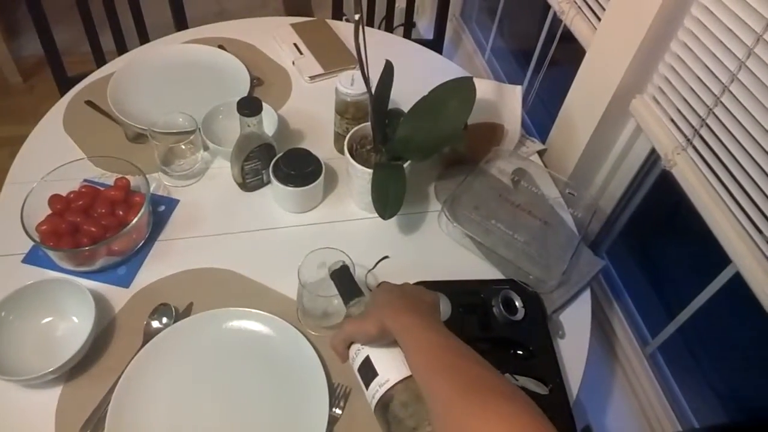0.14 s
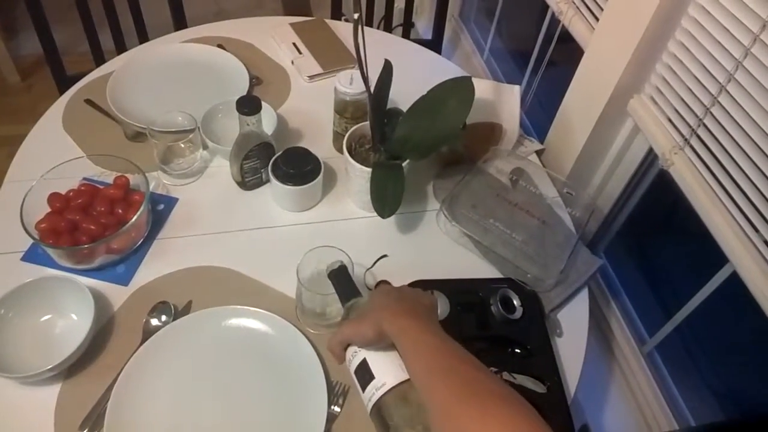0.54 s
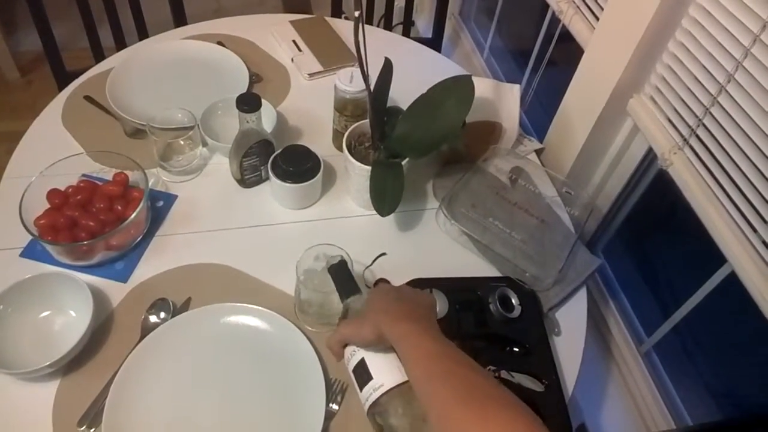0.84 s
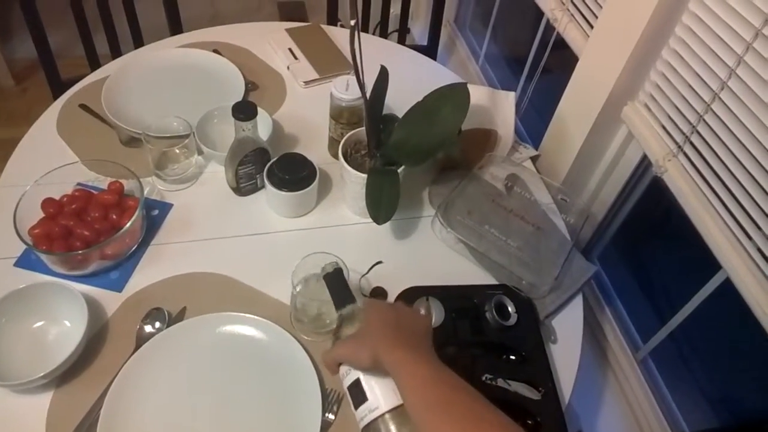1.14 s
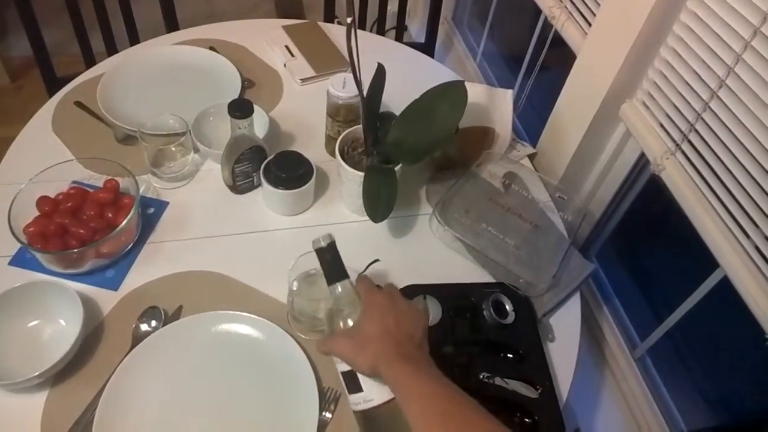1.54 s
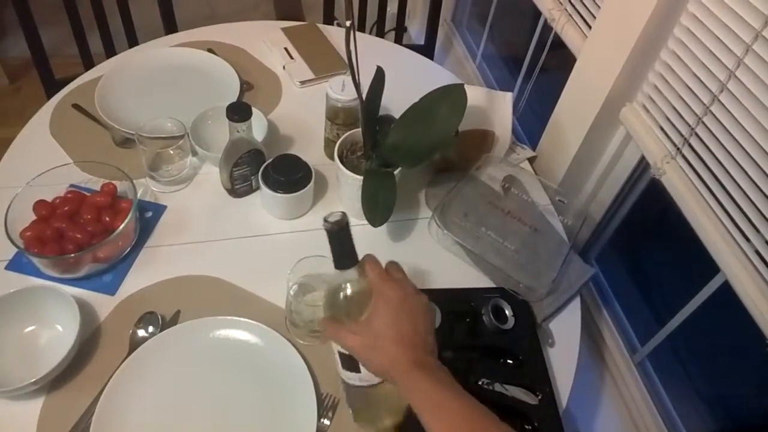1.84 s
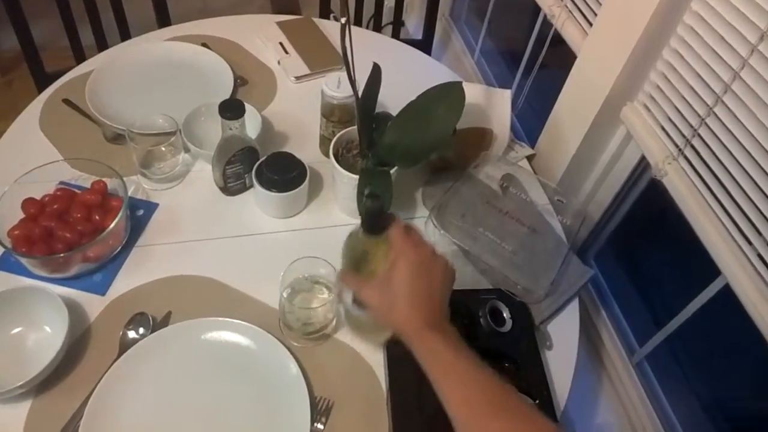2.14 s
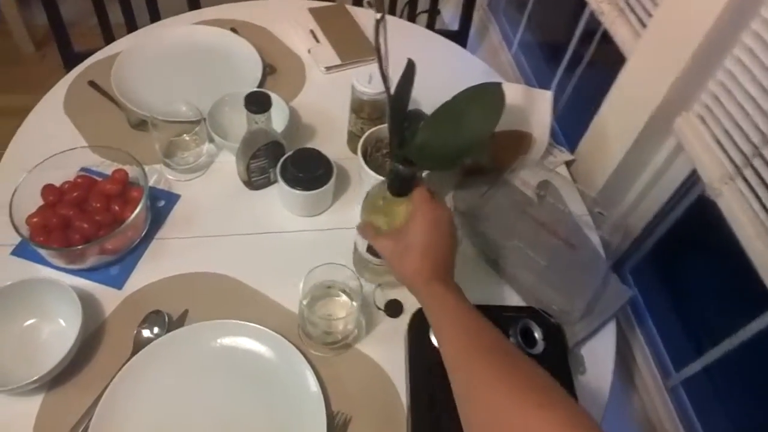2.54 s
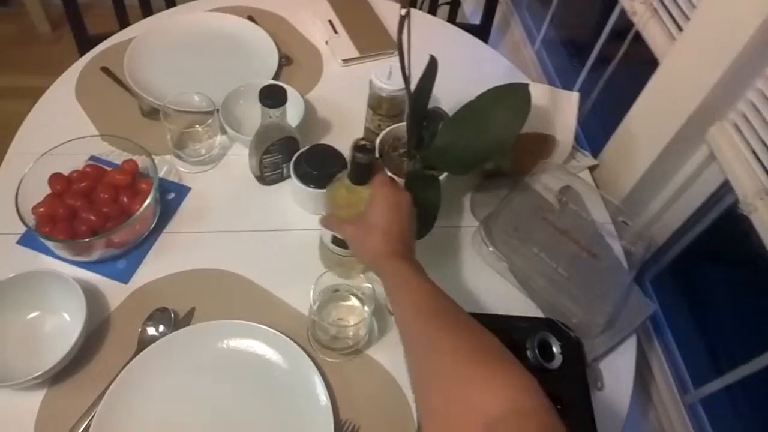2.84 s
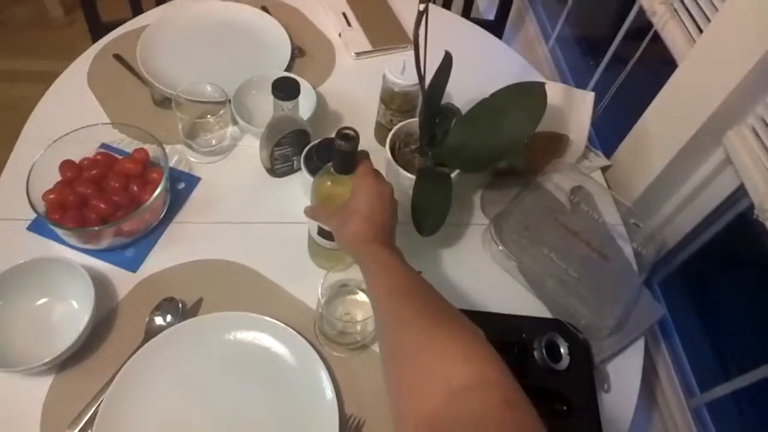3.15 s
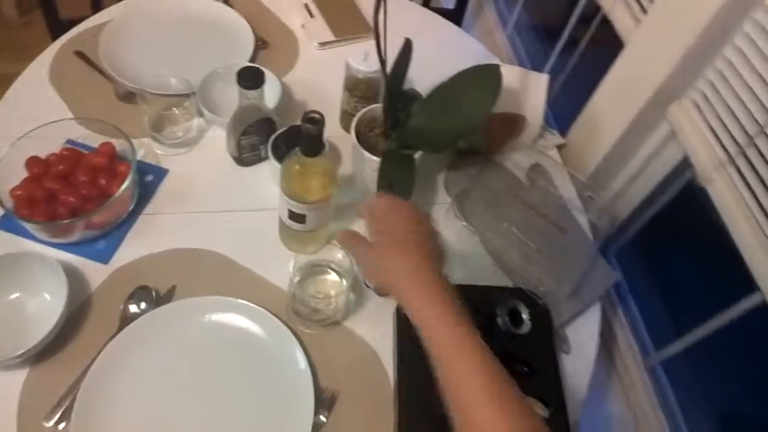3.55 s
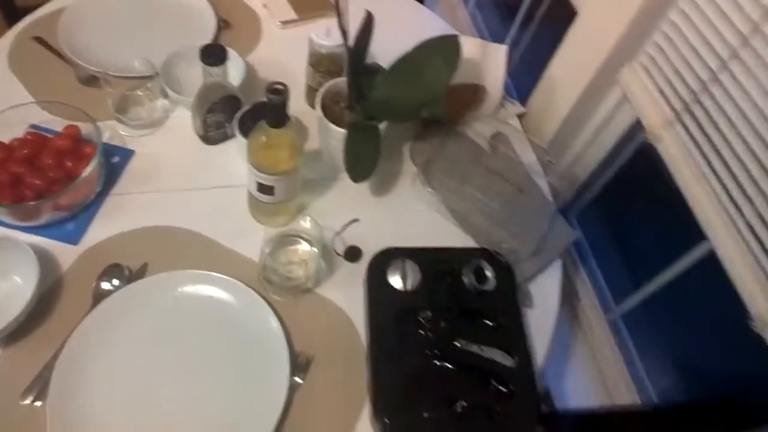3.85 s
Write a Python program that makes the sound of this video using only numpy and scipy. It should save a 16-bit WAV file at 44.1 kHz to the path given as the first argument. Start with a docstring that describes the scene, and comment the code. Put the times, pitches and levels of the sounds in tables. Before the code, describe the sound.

Wine glugs and fizzes from a bottle into a glass, then the bottle knocks onto a table.

```python
"""Wine glugs from a bottle into a glass: bubbles ring and pop, droplets tick, and a light fizz sinks and
swells, flares up near 1.45 s, then fades out.
Bubbles are swelling tones that climb in pitch; splashes, droplets and spray are coloured noise.
The bottle is stood on the dining table with a knock and a small clink, noise bursts over dying modes;
as the hand lets go there is a second, scuffing knock with a low push.
A small live room with low air noise and a faint appliance hum, heard in near mono."""
import sys
import numpy as np
from scipy import signal
from scipy.fft import rfft, irfft
from scipy.io import wavfile
from scipy.ndimage import uniform_filter1d

SR = 44100
rng = np.random.default_rng(int(sys.argv[2]) if len(sys.argv) > 2 else 0)


def generate_wav(signal):
    """Clip the signal to [-1, 1] and save it as 16-bit WAV at the path in sys.argv[1]."""
    frames = np.transpose(np.atleast_2d(signal))
    scaled = np.clip(frames, -1, 1) * 32767
    pcm = np.round(scaled).astype(np.int16)
    wavfile.write(sys.argv[1], SR, pcm)


N = 176400
T = np.arange(int(0.9 * SR)) / SR  # clock of one short sound, in seconds

# The fizz in the glass as it sinks, swells, flares up and fades out. Each row: time in seconds, level in dB.
FIZZ_LEVEL = [(0, -70.5), (.45, -75.5), (.75, -73), (1.1, -79.5), (1.299, -81.5), (1.45, -67.5), (1.7, -85),
              (1.801, -100)]
# Tone of the bottle's base on the table. Each row: frequency in Hz, relative level in dB.
BASE_TONE = [(40, -16.5), (130, -15), (190, -5.5), (400, -4.5), (800, -7.5), (2800, -18), (3900, -28.5),
             (5200, -28), (6200, -35)]
BUBBLE_RISE_PER_S = 1.27  # climb per second, as a fraction of the starting pitch


def amp(db):
    """Decibels to gain."""
    return 10 ** (np.asarray(db) / 20)


def unit(x):
    """Scales to rms 1."""
    return x / np.sqrt(np.mean(x ** 2) + 1e-20)


def read(points, hz):
    """Reads a table on a log-frequency axis."""
    f, value = np.transpose(points)
    return np.interp(np.log(hz + 1), np.log(f + 1), value)


def add(mix, s, sound):
    """Mixes a sound in at time s."""
    part = mix[max(0, round(s * SR)):][:len(sound)]
    part += sound[:len(part)]


def colour(x, spectrum):
    """Filters by a table of frequency in Hz and level in dB."""
    gain = amp(read(spectrum, np.fft.rfftfreq(len(x), 1 / SR)))
    return irfft(rfft(x) * gain, len(x))


def swell(seconds):
    """Rises to 1 in the given time, then dies away."""
    return T / seconds * np.exp(1 - np.minimum(T / seconds, 60))


def burst(spectrum, seconds, db):
    """A swelling puff of coloured noise."""
    noise = unit(colour(rng.standard_normal(len(T)), spectrum))
    return amp(db) * swell(seconds) * noise


def wander(hz):
    """Smooth chance of rms 1, up to about the given rate."""
    lowpass = signal.butter(2, hz, fs=SR, output="sos")
    return unit(signal.sosfilt(lowpass, rng.standard_normal(len(T))))


def dying(x):
    """Lets each band die away as fast as it does in the room."""
    # Decay of the room. Each row: frequency in Hz, time to fall by 60 dB in seconds.
    room_t60 = [(100, 0.32), (500, 0.4), (2000, 0.29), (5000, 0.24), (9000, 0.22), (14000, 0.14)]
    hz, t, z = signal.stft(x, SR, nperseg=256)
    decay = amp(-60 * t / read(room_t60, hz)[:, None])
    return signal.istft(z * decay, SR, nperseg=256)[1][:len(x)]


def room(x, wet_db, treble_db, gap_s):
    """Adds a dense tail of random reflections that arrives after a short gap."""
    signs = rng.choice([-1., 1.], len(T))
    present = rng.random(len(T)) < 0.15
    onset = np.clip(T / gap_s - 1, 0, 1)
    tail = dying(signs * present * onset)
    tail = colour(tail / np.linalg.norm(tail), [(3500, wet_db), (9000, wet_db + treble_db)])
    return x + signal.fftconvolve(x, tail)[:N]


def afterglow(spectrum, rise_s, db):
    """The diffuse room sound that builds up after a knock, as noise dying band by band."""
    noise = unit(colour(rng.standard_normal(len(T)), spectrum))
    return amp(db) * (1 - np.exp(-(T / rise_s) ** 2)) * dying(noise)


def ring(modes, attack_s):
    """Dying modes of a struck object, each wavering as its reflections mingle."""
    out = np.zeros(len(T))
    for hz, db, t60 in modes:
        waver = 1 + 0.22 * wander(26)
        out += amp(db - 60 * T / t60) * waver * np.sin(2 * np.pi * (hz * T + rng.random()))
    return (1 - np.exp(-T / attack_s)) * out


def bubble(hz, seconds, rise):
    """A ringing bubble, jostled by the stream, whose pitch climbs as it nears the surface."""
    jostle_hz = 225
    pitch = hz * (1 + rise * T + 0.031 * wander(jostle_hz))
    flutter = 1 + 0.28 * wander(jostle_hz)
    return swell(seconds) * flutter * np.sin(2 * np.pi * np.cumsum(pitch) / SR)


def chirp(hz, seconds):
    """A small, jostled bubble whose pitch climbs quickly as it surfaces."""
    return bubble(hz, seconds, rise=6)


def room_tone():
    """Low air noise and an appliance hum whose tones waver in phase."""
    # Tone of the air in the room. Each row: frequency in Hz, relative level in dB.
    air = [(18, -32.5), (30, 2), (91, -9.5), (123, -1.5), (152, -12.5), (288, -2.5), (786, -25.5),
           (14000, -52)]
    # Partials of the hum. Each row: frequency in Hz, level in dB.
    hum = [(122, -74.5), (241, -79), (357, -77.5)]
    t = np.arange(N) / SR
    out = amp(-67.5) * unit(colour(rng.standard_normal(N), air))
    for hz, db in hum:
        waver = unit(colour(rng.standard_normal(N), [(3, 0), (20, -40), (100, -100)]))
        # root two makes the level an rms level
        out += amp(db) * np.sqrt(2) * np.sin(2 * np.pi * hz * t + 0.44 * waver)
    return out


def ringing_bubbles():
    """Bubbles ring in the glass, each a swelling tone that climbs slowly; the last drip glides up."""
    # Each row: start in seconds, starting pitch in Hz, level in dB, swell in seconds.
    bubbles = [(0, 940, -40.5, 0.0048), (.016, 937, -40, 0.0047), (0.237, 2983, -49.5, 0.0044),
               (.436, 809, -57, 0.0059), (.613, 1880, -57, 0.0045), (.784, 1118, -43.5, 0.0028),
               (.869, 5060, -53, 0.0018), (1.071, 1080, -50, 0.0055), (1.083, 1016, -49, 0.0071),
               (1.350, 2820, -45, 0.0021), (1.352, 3680, -44, 0.0016), (1.382, 2085, -51.5, 0.0052),
               (1.47, 1176, -52, 0.0052), (1.518, 2876, -47.5, 0.0022), (1.637, 794, -55, 0.0033)]
    out = np.zeros(N)
    for s, hz, db, seconds in bubbles:
        add(out, s, amp(db) * bubble(hz, seconds, BUBBLE_RISE_PER_S))
    add(out, 1.638, amp(-60.5) * bubble(1150, 0.0087, rise=9))
    return out


def fizz():
    """Small random bubbles and patches of fine spray while the wine runs."""
    # Tone of the spray. Each row: frequency in Hz, relative level in dB.
    spray_tone = [(100, -9.5), (700, 10.5), (1500, 2.5), (4500, -3), (6500, -13.5), (9500, 3), (15000, -10)]
    bubbles_per_s, bands, grain_length = 500, 40, SR // 50
    level = amp(np.interp(np.arange(N) / SR, *np.transpose(FIZZ_LEVEL)))
    out = np.zeros(N)
    for hz in np.geomspace(2600, 13500, num=bands):
        strength = amp(10 * np.minimum(rng.exponential(1, N), 3))  # a few bubbles are much stronger
        births = (rng.random(N) < bubbles_per_s / bands / SR) * strength
        pitch = hz * (1 + 0.5 * rng.standard_normal(grain_length))  # jitter roughens the tone
        grain = swell(0.0022)[:grain_length] * np.sin(2 * np.pi * np.cumsum(pitch) / SR)
        out += signal.oaconvolve(births, grain)[:N]
    z = signal.stft(rng.standard_normal(N), nperseg=256)[2]
    patches = uniform_filter1d(rng.standard_normal(z.shape), size=9, axis=0)
    patches = unit(uniform_filter1d(patches, size=4, axis=1))
    spray = signal.istft(z * amp(3 * patches), nperseg=256)[1][:N]
    return level * (unit(out) + amp(-3.5) * unit(colour(spray, spray_tone)))


def gurgle():
    """Middle-sized bubbles churned up at random, their level following the fizz."""
    per_s, middle_hz, octaves = 75, 2187, 0.9  # pitches reach 0.9 octaves either way
    out, length = np.zeros(N), FIZZ_LEVEL[-1][0]
    for when, size, strength in rng.random((300, 3))[:int(per_s * length)]:
        s = when * length
        db = np.interp(s, *np.transpose(FIZZ_LEVEL)) + 9 + 4.5 * (2 * strength - 1)
        hz = middle_hz * 2 ** (octaves * (2 * size - 1))
        add(out, s, amp(db) * chirp(hz, 0.0014))
    return out


def gush():
    """The first gush of wine, a soft low puff of noise."""
    # Each row: frequency in Hz, relative level in dB.
    gush_tone = [(300, -9), (600, -11.5), (1100, -2.5), (4500, -27), (6500, -41)]
    out = np.zeros(N)
    add(out, 0.036, burst(gush_tone, 0.028, -46.5))
    return out


def pops():
    """Tiny bubbles burst, each a very short high tone with a puff of spray."""
    # Each row: start in seconds, pitch in Hz, level in dB.
    pop_rows = [(.058, 9300, -45), (0.129, 9900, -47), (0.4116, 9150, -45), (0.5219, 10660, -38.5),
                (.525, 8400, -43), (.535, 9250, -42), (0.7843, 9400, -50.5), (0.8696, 10500, -44),
                (1.0456, 12700, -44), (1.074, 10700, -40.5), (1.151, 10200, -29.5), (1.3548, 9180, -34.5),
                (1.3739, 9500, -41), (1.4444, 10100, -41), (.734, 7400, -46.5), (1.5095, 10400, -36),
                (1.63, 9200, -45)]
    # Tone of the puffs. Each row: frequency in Hz, relative level in dB.
    puff_tone = [(3000, -22.5), (6500, -16), (8800, 7.5), (11000, 0.5), (15000, -8)]
    out = np.zeros(N)
    for s, hz, db in pop_rows:
        tone = amp(db) * swell(0.00028) * np.sin(2 * np.pi * hz * T)
        add(out, s, tone + burst(puff_tone, 0.002, db - 15.5))
    return out


def cluster(hz):
    """Smaller and larger bubbles that each glug drags under."""
    out = np.zeros(len(T))
    for delay, size in rng.random((8, 2)):
        pitch = hz * 2 ** (1.004 * (2 * size - 1))  # about an octave either way
        add(out, 0.05 * delay ** 2, (1 - delay / 2) * bubble(pitch, 0.0017, BUBBLE_RISE_PER_S))
    return amp(-16) * out


def glugs():
    """Each glug of the bottle is a bubble with a cluster of others and a splash of noise."""
    # Each row: start in seconds, starting pitch in Hz, level in dB, splash level in dB.
    glug_rows = [(0.225, 1795, -41, -48), (.395, 1827, -49, -57), (.582, 1877, -45.5, -58),
                 (.778, 1792, -50, -54.5), (0.955, 1976, -49.5, -58.5)]
    # Tone of the splashes. Each row: frequency in Hz, relative level in dB.
    splash_tone = [(100, 0.5), (1100, -0.5), (1900, 8), (2600, -8.5), (4500, -2), (5400, -18.5),
                   (15000, -26)]
    out = np.zeros(N)
    for s, hz, db, splash_db in glug_rows:
        bubbles = bubble(hz, 0.0059, rise=0.27) + cluster(hz)
        add(out, s, amp(db) * bubbles + burst(splash_tone, 0.0074, splash_db))
    return out


def droplets():
    """Droplets strike the wine as tiny ticks of noise."""
    # Each row: start in seconds, level in dB.
    drops = [(.241, -52.5), (.462, -56.5), (0.52, -56.5), (0.7845, -43), (0.8692, -52), (1.0717, -60),
             (1.252, -61.5), (1.349, -53.5), (1.41, -60), (1.470, -48), (1.52, -50.5), (1.6315, -47.5)]
    # Tone of the ticks. Each row: frequency in Hz, relative level in dB.
    drop_tone = [(700, 2), (1400, 5), (2200, -11), (3700, 6.5), (6000, -4), (9200, 10), (15000, -4.5)]
    out = np.zeros(N)
    for s, db in drops:
        add(out, s, burst(drop_tone, 0.0013, db))
    return out


def chirps():
    """Small bubbles chirp upward between the glugs and after them."""
    # Each row: start in seconds, starting pitch in Hz, level in dB.
    chirp_rows = [(0.321, 2750, -57.5), (.448, 4900, -59), (0.469, 4500, -58.5), (0.71, 3600, -58.5),
                  (1.126, 2680, -56.5), (1.191, 3600, -54), (1.399, 3550, -52.5)]
    out = np.zeros(N)
    for s, hz, db in chirp_rows:
        add(out, s, amp(db) * chirp(hz, 0.0017))
    return out


def spatter():
    """One faint, bright spatter of noise."""
    # Each row: frequency in Hz, relative level in dB.
    spatter_tone = [(3500, -18), (6000, -1), (9000, -13.5)]
    out = np.zeros(N)
    add(out, 1.072, burst(spatter_tone, 0.022, -70.5))
    return out


def pour():
    """The whole pour, with the room's reflections around it."""
    out = ringing_bubbles() + fizz() + gurgle() + gush() + pops()
    out += glugs() + droplets() + chirps() + spatter()
    return room(out, wet_db=-9.0, treble_db=-21, gap_s=0.0066)


def handling():
    """Faint rustles and light touches on the table as the arm moves, as puffs of noise."""
    # Each row: start in seconds, swell in seconds, level in dB.
    rustles = [(2.982, 0.015, -65.5), (3.907, 0.012, -79.5), (3.978, 0.017, -73.5)]
    # Tone of the rustles. Each row: frequency in Hz, relative level in dB.
    rustle_tone = [(1000, -5.5), (2300, 2), (7000, -8.5)]
    # Light touches. Each row: start in seconds, level in dB.
    touches = [(3.116, -61.5), (3.904, -68.5), (3.921, -65)]
    out = np.zeros(N)
    for s, seconds, db in rustles:
        add(out, s, burst(rustle_tone, seconds, db))
    for s, db in touches:
        add(out, s, burst(BASE_TONE, 0.0016, db))
    return room(out, wet_db=-5.5, treble_db=-11, gap_s=0.0027)


def bottle_down():
    """The base knocks and settles, the table top and the bottle ring, and the glass clinks."""
    # The base meets the table, then settles. Each row: start in seconds, level in dB.
    blows = [(3.1438, -34.5), (3.148, -29), (3.169, -46.5)]
    # Modes of table top, bottle and glass. Each row: frequency in Hz, level in dB, 60 dB decay in seconds.
    table_modes = [(134.7, -31.5, 0.35), (259, -31.5, 0.069), (464, -35.5, 0.36)]
    bottle_modes = [(1012, -42, 0.59), (1556, -50.5, 0.41), (2000, -44, .27), (2670, -46.5, .28),
                    (2716, -43.5, 0.3), (3665, -48.5, 0.26), (5220, -55, 0.22)]
    glass_modes = [(11030, -54, .19), (12200, -52, .13)]
    out = np.zeros(N)
    for s, db in blows:
        add(out, s, burst(BASE_TONE, 0.0057, db))
    contact_s = blows[0][0]
    add(out, contact_s, ring(table_modes, attack_s=0.0015) + ring(bottle_modes, attack_s=0.0015))
    add(out, contact_s, afterglow(BASE_TONE, 0.025, -26.5))
    add(out, 3.170, ring(glass_modes, attack_s=0.00027))
    return out


def second_knock():
    """A bright, rattling scuff runs into a hollow thud with a low push."""
    # Tones of scuff and thud. Each row: frequency in Hz, relative level in dB.
    scuff_tone = [(500, -13), (900, -9.5), (5000, -11.5), (6600, -18.5), (8300, -20.5), (10500, -14.5),
                  (14000, -22.5)]
    thud_tone = [(18, -38), (30, -10.5), (207, -10), (338, -4), (1000, -13.5), (1560, -33), (2640, -120)]
    # The base rattles on the table. Each row: start in seconds, level in dB.
    rattles = [(3.4915, -39), (3.5033, -33.5), (3.535, -42)]
    # Modes rung by the thud. Each row: frequency in Hz, level in dB, 60 dB decay in seconds.
    thud_modes = [(277.1, -29, 0.2), (344.5, -34.5, 0.3), (410.8, -33, 0.21), (612, -39.5, .45),
                  (680, -32.5, 0.33), (920, -38, .34), (1561, -42.5, 0.23)]
    scuff_s, thud_s = 3.4875, 3.502
    out = np.zeros(N)
    grain = 1 + 0.28 * wander(160)
    add(out, scuff_s, burst(scuff_tone, 0.027, -34) * grain)
    for s, db in rattles:
        add(out, s, burst(scuff_tone, 0.0017, db))
    add(out, thud_s, burst(thud_tone, 0.012, -31.5) + ring(thud_modes, attack_s=0.0011))
    add(out, thud_s, afterglow(scuff_tone, 0.053, -23.5) + afterglow(thud_tone, 0.043, -29))
    push = amp(-33.5) * swell(0.006) * np.sin(2 * np.pi * 66.5 * T)
    add(out, thud_s, push)
    return out


def scene():
    """All sources in the middle; only the treble differs in phase between the channels."""
    # Width of the stereo image. Each row: frequency in Hz, side level in dB.
    width = [(3300, -72), (3800, -25), (8000, -9)]
    mid = pour() + bottle_down() + second_knock() + handling() + room_tone()
    scatter = rng.standard_normal(89)
    scatter = scatter - scatter[::-1]  # odd symmetry turns the phase by a quarter cycle
    side = colour(np.convolve(mid, scatter / np.linalg.norm(scatter), "same"), width)
    return np.array([mid + side, mid - side])


def record(dry):
    """The knocks softly overload the microphone; then the band limit and the recorder's small offset."""
    ceiling, edge_hz, offset = 0.13, 14400, -0.0018  # ceiling and offset as parts of full scale
    pressed = ceiling * np.tanh(dry / ceiling)
    lowpass = signal.firwin(511, edge_hz, window=("kaiser", 8), fs=SR)
    return offset + signal.oaconvolve(pressed, lowpass[None], "same")


dry = scene()
out = record(dry)
generate_wav(out)
```